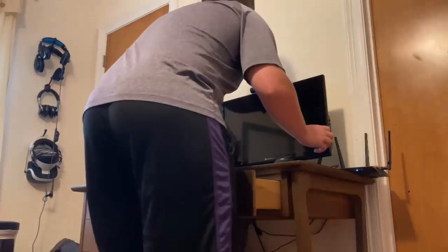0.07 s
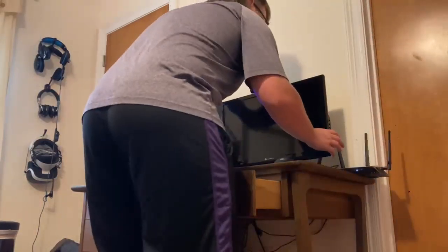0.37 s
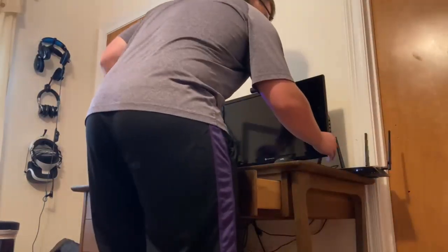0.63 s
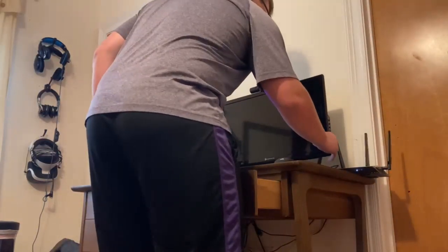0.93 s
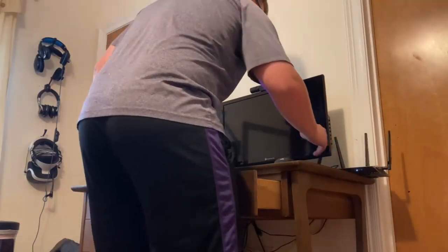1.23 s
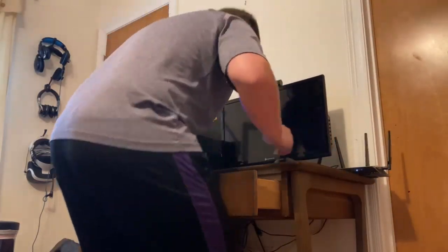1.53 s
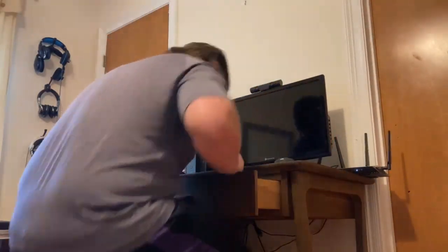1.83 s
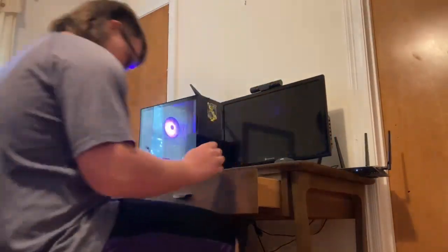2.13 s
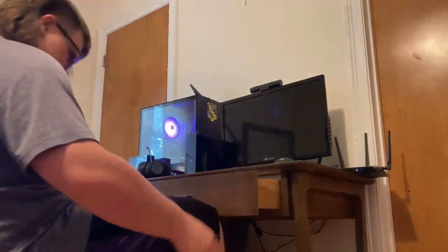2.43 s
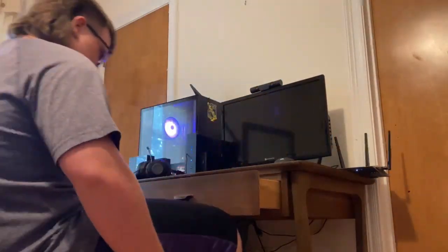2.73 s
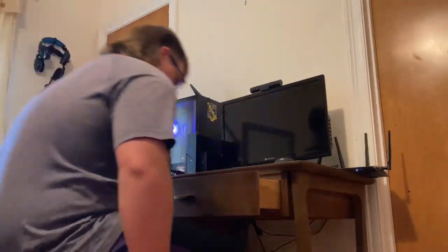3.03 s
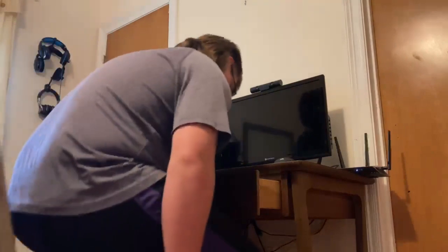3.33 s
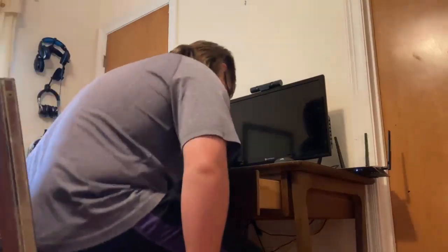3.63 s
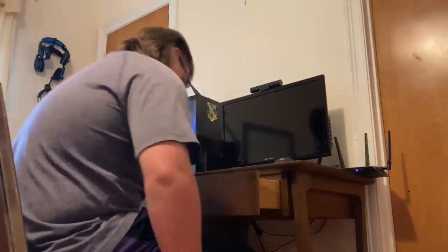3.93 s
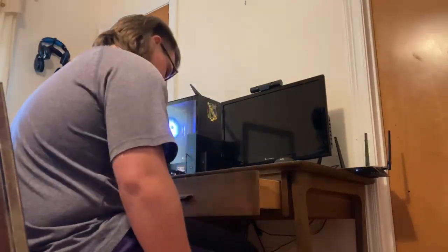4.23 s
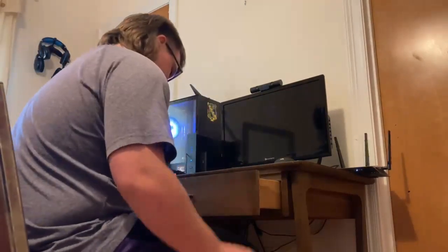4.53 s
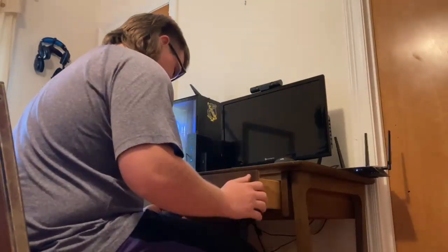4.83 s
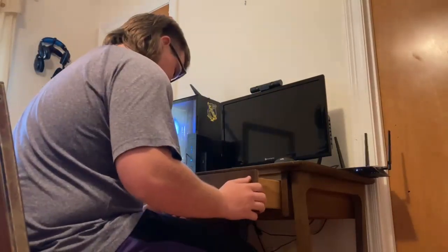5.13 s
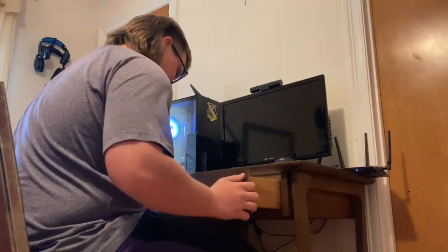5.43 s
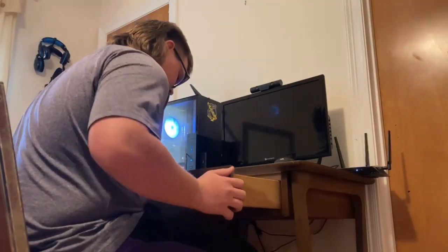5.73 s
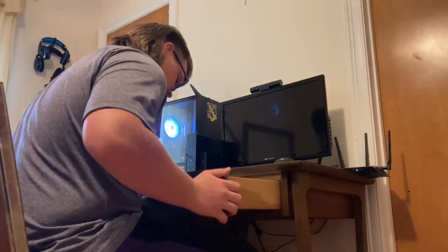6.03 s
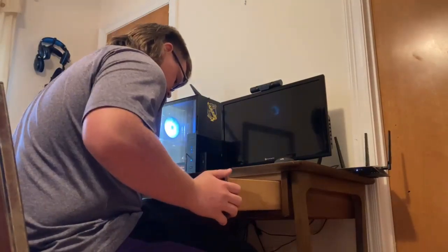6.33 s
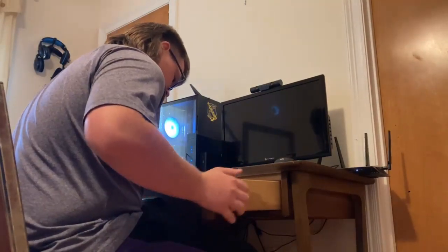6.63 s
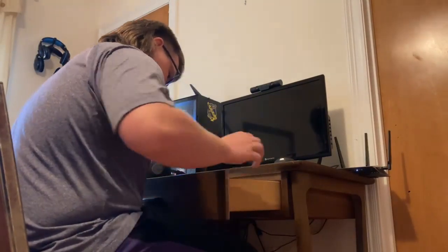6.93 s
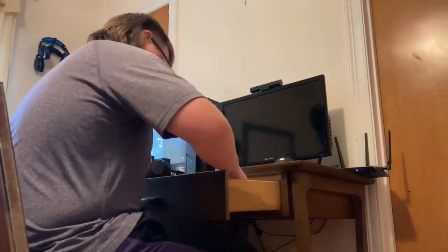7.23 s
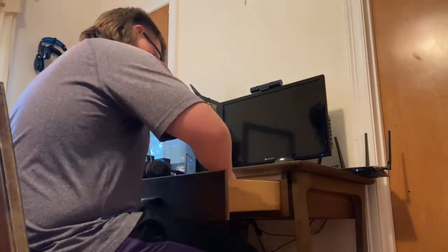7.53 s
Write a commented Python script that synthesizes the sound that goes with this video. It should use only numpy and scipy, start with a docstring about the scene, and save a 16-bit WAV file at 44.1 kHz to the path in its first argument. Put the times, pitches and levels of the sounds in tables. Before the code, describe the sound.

A faint, low computer hum runs throughout in a small bedroom with briefly ringing walls. During the first 1.6 seconds, light rubs, clicks and taps touch a wooden desk. From about 1.9 to 2.4 seconds someone sits on a wooden chair, making loud knocks, leg scuffs and low floor thuds, followed by a rasping creak, small ticks and taps. The chair creaks again at 3.1 seconds, then judders over the floor and drops onto its legs with a loud cluster of thumps around 3.4 seconds. Clothes rustle softly with the movement. From 4.6 to 6 seconds a tight wooden drawer slides out in quieter jerks, with small catches and short, low groans. A faint tap and rub come at 6.6 seconds, a wooden clack at 7.2, and a sleeve brush and light tap near 7.5. The furniture sounds slightly to the left.

```python
"""A small bedroom, where bare walls reverberate after every knock and a computer hums. Someone sits
on a wooden chair, drags it up to a desk and drops it on its legs, then works a wooden drawer open;
small things tap the desk and clothes rustle. Impacts excite the damped normal modes of the wood.
Sliding friction is a run of tiny slips: random ones rub and rasp, and nearly periodic ones
(stick-slip) judder and groan."""
import sys
import numpy as np
from scipy import signal
from scipy.fft import rfft, irfft, next_fast_len
from scipy.io import wavfile
from scipy.ndimage import map_coordinates

SR = 44100
rng = np.random.default_rng(int(sys.argv[2]) if len(sys.argv) > 2 else 0)


def wav_record(signal):
    """Record a signal, one row per channel, as 16-bit PCM in the file named by sys.argv[1]."""
    frames = np.transpose(np.atleast_2d(signal))
    bounded = np.clip(frames, -1, 1)
    # unit amplitude maps onto the largest positive 16-bit level
    quanta = np.round(bounded * 32767).astype(np.int16)
    wavfile.write(sys.argv[1], SR, quanta)


N = 343098
TIME = np.arange(N) / SR
AGE = TIME[:SR * 3 // 4]  # time since a blow [s]


def amp(db):
    """Amplitude ratio of a level in decibels."""
    return 10 ** (np.asarray(db) / 20)


def unit(x):
    """Normalisation to rms 1."""
    return x / np.sqrt(np.mean(x ** 2) + 1e-20)


def at_level(sound, db, length):
    """Normalisation to an rms level over the first length seconds."""
    return amp(db) * sound / np.sqrt(np.mean(sound[:, :int(length * SR) + 1] ** 2) + 1e-20)


def along(points, hz):
    """Interpolation of (frequency, value) points on a logarithmic frequency axis."""
    freqs, values = np.transpose(points)
    return np.interp(np.log(hz + 1), np.log(freqs + 1), values)


def mix(events):
    """Linear superposition of (time [s], sound) events on a stereo track."""
    track = np.zeros((2, N))
    for s, sound in events:
        start = round(s * SR)
        track[:, start:start + sound.shape[-1]] += sound[..., :N - start]
    return track


def wobble(rate):
    """Smooth random modulation through rate knots a second."""
    return map_coordinates(rng.standard_normal(int(N * rate / SR) + 4), [TIME * rate])


def fade(t60):
    """Exponential damping: 60 dB in t60 seconds."""
    return amp(-60 * AGE / t60)


def stroke(length, rise):
    """Pressure envelope of a short rub: it builds, holds and lets go."""
    return (1 - np.exp(-AGE / rise)) * np.exp(-(AGE / length) ** 4)


def gate(s, length, rise, release):
    """Envelope of an effort: exponential rise from time s, exponential release after its length."""
    attack = 1 - np.exp(-np.maximum(TIME - s, 0) / rise)
    return attack * np.exp(-np.maximum(TIME - s - length, 0) / release)


def band(x, edge_hz, kind):
    """Third-order low-, high- or band-pass filtering."""
    return signal.sosfilt(signal.butter(3, edge_hz, kind, fs=SR, output="sos"), x)


def coloured(x, spectrum):
    """Minimum-phase filtering by a (frequency [Hz], gain [dB]) curve."""
    n = x.shape[-1]
    m = 2 * next_fast_len(n // 2 + SR // 10)
    gain = amp(along(spectrum, np.fft.rfftfreq(m, 1 / SR)))
    cepstrum = irfft(np.log(gain + 1e-6))
    cepstrum[1:m // 2] *= 2  # folding the cepstrum makes the filter causal
    cepstrum[m // 2 + 1:] = 0
    return irfft(rfft(x, m) * np.exp(rfft(cepstrum)), m)[..., :n]


# left-right coherence of the diffuse field: (frequency [Hz], coherence [ratio])
COHERENCE = [(50, 0.93), (170, 0.79), (400, 0.87), (700, 0.31), (1400, 0.035), (3000, 0.21)]
def diffuse(n):
    """Diffuse-field white noise: the channels are alike in the bass and little related in the treble."""
    angle = np.arccos(np.clip(along(COHERENCE, np.fft.rfftfreq(n, 1 / SR)), -1, 1)) / 2
    mid, side = irfft(rfft(rng.standard_normal((2, n))) * [np.cos(angle), np.sin(angle)], n)
    return np.array([mid + side, mid - side])


# reverberation time of the room: (frequency [Hz], t60 [s])
ROOM_T60 = [(80, .38), (300, .38), (1000, .44), (4000, .47), (8000, .39), (15000, .27)]
def in_room(x, wet_db, early_db=-1, left_lead=-3):
    """Convolution with a unit-energy room response: direct sound, furniture echoes and the walls' tail."""
    n = len(AGE)
    hz, t, spectra = signal.stft(diffuse(n), SR, nperseg=256)
    decay = amp(-60 * t / along(ROOM_T60, hz)[:, None])
    tail = signal.istft(spectra * decay, SR, nperseg=256)[1][:, :n]
    early = diffuse(n) * fade(0.17)
    response = (amp(wet_db) * unit(tail) + amp(early_db) * unit(early)) / np.sqrt(n)
    response[0, max(-left_lead, 0)] += amp(-5)  # direct sound; the lead is in samples
    response[1, max(left_lead, 0)] += amp(-5)
    return signal.fftconvolve(x[None], unit(response) / np.sqrt(n), axes=1)[:, :len(x)]


def ringing(modes):
    """Impulse response as a sum of damped normal modes, a little different at each contact."""
    return unit(sum(
        amp(db + rng.normal(0, 2)) * fade(t60) * np.sin(2 * np.pi * hz * rng.normal(1, .004) * AGE)
        for hz, db, t60 in modes))


def through(force, colour, modes, ring_db):
    """Forced response of a body: its broad colour plus its ringing modes."""
    ring = signal.fftconvolve(force, ringing(modes))[:len(force)]
    return unit(coloured(force, colour)) + amp(ring_db) * unit(ring)


def blow(colour, modes, db, thump_db, crack_db, force_t60, ring_db, snap_db, rise_s=0.003, **room):
    """Impact response: a mid-band knock at db, with a low thump and a high crack relative to it."""
    force = rng.standard_normal(len(AGE)) * fade(force_t60)
    force[SR // 1000] += amp(snap_db) * np.linalg.norm(force)  # the snap is a single impulse
    onset = 1 - np.exp(-AGE / rise_s)
    wood = unit(coloured(force, colour)) + amp(ring_db) * ringing(modes)
    sound = in_room(onset * wood, **room)
    thump = at_level(band(sound, [70, 400], "band"), db + thump_db, 0.016)
    knock = at_level(band(sound, [400, 2500], "band"), db, 0.016)
    crack = at_level(band(sound, 2500, "high"), db + crack_db, 0.016)
    return thump + knock + crack


def grains(n, rate, spread_db):
    """Friction as shot noise: on average rate slips a second, of random sign and size."""
    slips = (rng.random(n) < rate / SR) * rng.choice([-1, 1], n)
    return unit(slips * amp(spread_db * rng.standard_normal(n)))


def stick_slip(length, rate, jitter, sag=0):
    """Relaxation oscillation: nearly periodic slips whose gaps grow by the fraction sag."""
    gaps = np.abs(rng.normal(1, jitter, size=40)) / rate
    gaps *= 1 + sag * np.minimum(np.cumsum(gaps) / length, 1) ** 2
    slips = np.cumsum(gaps) - gaps[0]
    sizes = amp(rng.normal(0, 1.0, size=40)) * (slips < length)
    return np.bincount((slips * SR).astype(int), sizes, len(AGE))[:len(AGE)]


# spectrum of the fans: (frequency [Hz], gain [dB])
FAN_COLOUR = [(20, -35), (50, 3), (125, 2.5), (200, -14), (255, -8.5), (300, -15), (550, -24), (1000, -34),
              (1400, -34.5), (1800, -45), (7000, -53), (15000, -51.5)]
# tones of the hum: (frequency [Hz], rms level [dB])
HUM_TONES = [(118.4, -58.5), (258.4, -74)]
def computer():
    """Broadband fan noise rumbles under tones that waver by slight phase modulation."""
    air = unit(coloured(diffuse(N), FAN_COLOUR)) * amp(-51.5)
    hum = sum(amp(db) * np.sqrt(2) * np.sin(2 * np.pi * hz * TIME + 0.12 * wobble(2.7))
              for hz, db in HUM_TONES)
    return air + hum


# spectrum of dull rubbing: (frequency [Hz], gain [dB])
RUB_COLOUR = [(300, 0.5), (800, 3.5), (1500, 1.5), (3500, -2), (5500, -12.5), (9000, -22.5)]
# rubs over wood: (time [s], duration [s], level [dB])
WOOD_RUBS = [(0.0, 0.034, -46), (0.111, 0.07, -51.5), (0.501, 0.14, -66), (3.315, .09, -42),
             (6.585, .08, -59)]
def wood_rubs():
    """Dry sliding friction: a hand or a chair leg crosses wood in dense, tiny slips."""
    for s, length, db in WOOD_RUBS:
        force = grains(len(AGE), rate=3900, spread_db=1.5) * stroke(length, rise=0.00043)
        yield s, at_level(in_room(coloured(force, RUB_COLOUR), wet_db=-6), db, length)


# spectrum of sliding cloth: (frequency [Hz], gain [dB])
SWISH_COLOUR = [(2500, -6.5), (5500, -1), (7600, 1.5), (11500, -3.5), (16000, -14)]
# strength of the sitter's movement: (time [s], level [dB])
BODY_MOTION = [(1.6, -78.5), (1.91, -62.5), (2.04, -61), (2.29, -58), (2.83, -69.5), (3.1, -63),
               (3.34, -52), (3.408, -55), (3.58, -73.5), (3.7, -72)]
# a sleeve brushes by as the arm reaches: (time [s], duration [s], level [dB])
SLEEVE_BRUSHES = [(0.058, 0.12, -60), (0.464, 0.098, -69.5), (1.145, 0.12, -61), (1.403, 0.19, -63.5),
                  (3.762, 0.13, -52), (4.288, 0.3, -70.5), (5.139, 0.063, -57), (5.467, 0.31, -72),
                  (7.304, .2, -60)]
def clothes():
    """Cloth friction: a dull rub under pressure and a bright swish in sliding, both following motion."""
    times, motion_db = np.transpose(BODY_MOTION)
    moving = gate(times[0], times[-1] - times[0], rise=0.049, release=0.049)
    body = amp(np.interp(TIME, times, motion_db)) * moving
    sleeve = sum(amp(db) * np.exp(-(2 * (TIME - s) / length - 1) ** 2)
                 for s, length, db in SLEEVE_BRUSHES)
    rub = unit(coloured(grains(N, rate=2800, spread_db=2), RUB_COLOUR))
    rub *= amp(5.5) * body + amp(-5) * sleeve  # a light brush rubs less than it swishes
    swish = unit(coloured(grains(N, rate=4700, spread_db=5.5), SWISH_COLOUR))
    swish *= amp(4.5) * body + sleeve
    folds = amp(2.6 * wobble(28))  # folds catch and let go
    return in_room((rub + swish) * folds, wet_db=2.5)


# spectrum of the struck desk: (frequency [Hz], gain [dB])
DESK_COLOUR = [(120, -11), (400, -9.5), (600, -7), (1150, -10), (1700, -14), (3500, -17.5), (7400, -22),
               (15500, -38.5)]
# taps on desk and drawer: (time [s], level [dB], crack [dB re knock], resonance [Hz])
LIGHT_TAPS = [(0.137, -49.5, -31, 1356), (1.022, -50.5, -20, 678), (1.317, -49.5, -15.5, 1323),
              (1.426, -56, -3.5, 2216), (1.456, -47.5, -19, 800), (1.604, -54, -17.5, 780),
              (2.098, -40, -25, 1100), (2.573, -43, -16, 1503), (2.79, -50, -12, 900),
              (6.634, -56, -22, 1100), (7.541, -52, -15, 1437)]
def desk_taps():
    """Light tap: a fingertip or small thing knocks the wood and excites one local resonance."""
    for s, db, crack_db, hz in LIGHT_TAPS:
        spot = [(hz, 0, 0.015)]  # one mode with a t60 of 15 ms
        yield s, blow(DESK_COLOUR, spot, db, thump_db=-3, crack_db=crack_db, force_t60=0.033,
                      ring_db=-7, snap_db=4, rise_s=0.004, wet_db=-0.5)


# normal modes of the desk: (frequency [Hz], relative level [dB], t60 [s])
DESK_RESONANCES = [(365, -1, .11), (432, 0, .15), (598, 1, .13), (1140, 5, .06), (1695, 5, .045),
                   (2295, -1, .06), (2945, -7, .03), (4737, -14, .1)]
# spectrum of a hard contact: (frequency [Hz], gain [dB])
CLICK_COLOUR = [(150, 10.5), (400, 3), (700, 2), (1600, -3), (3200, -2), (4500, 1.5), (7000, -2),
                (11000, -5.5), (15500, -13)]
# clicks under the hand: (time [s], level [dB])
HARD_CLICKS = [(0.226, -40), (0.488, -63), (0.879, -55), (0.915, -48)]
def monitor_clicks():
    """Hard impact: the force is nearly an impulse, and a firmer click is brighter."""
    firmest_db = max(db for s, db in HARD_CLICKS)
    for s, db in HARD_CLICKS:
        crack_db = 1.5 + 0.65 * (db - firmest_db)
        yield s, blow(CLICK_COLOUR, DESK_RESONANCES, db, thump_db=-6.5, crack_db=crack_db,
                      force_t60=0.012, ring_db=-25, snap_db=16, wet_db=-3.5, early_db=-4)


CHAIR_LEAD = 9  # earlier arrival in the left channel [samples]
# spectrum of a rasping joint: (frequency [Hz], gain [dB])
RASP_COLOUR = [(250, -0.5), (600, 0), (1400, -6.5), (2020, -4.5), (2700, -4.5), (3500, -3.5), (5500, -10),
               (7300, -16), (11000, -6), (16000, -20)]
# normal modes of the joints: (frequency [Hz], relative level [dB], t60 [s])
JOINT_RESONANCES = [(2019, 3, .12), (3408, -2, .08), (4484, -2, .06), (5076, -8, .3), (7257, -4, .07)]
# rasps of the chair's frame: (time [s], duration [s], level [dB])
JOINT_RASPS = [(1.868, 0.011, -47), (2.39, 0.081, -40.5), (3.115, 0.07, -35)]
def joint_rasps():
    """Frictional excitation: a run of tiny slips makes the chair's dry joints ring."""
    for s, length, db in JOINT_RASPS:
        force = grains(len(AGE), rate=900, spread_db=5) * stroke(length, rise=0.0058)
        rasp = through(force, RASP_COLOUR, JOINT_RESONANCES, ring_db=-4)
        yield s, at_level(in_room(rasp, wet_db=-2, left_lead=CHAIR_LEAD), db, length)


# spectrum of the chair: (frequency [Hz], gain [dB])
CHAIR_COLOUR = [(30, -33.5), (60, -18), (230, -15), (390, -3.5), (680, -4.5), (800, -8), (1150, -12.5),
                (2060, -22), (5000, -32.5), (11000, -37), (15500, -47)]
# normal modes of the chair: (frequency [Hz], relative level [dB], t60 [s])
CHAIR_RESONANCES = [(290, -3, .12), (388, -2, .1), (426, -1, .1), (525, 0, .1), (600, -3, .08),
                    (674, -1, .11), (1020, -7, .08), (1160, -5, .09), (1336, -7, .09)]
# the joints take the sitter's weight: (time [s], level [dB], thump [dB re knock])
SEAT_IMPACTS = [(1.895, -22, -1), (1.906, -27, 4), (1.927, -23, -12), (2.120, -30, -5), (2.139, -28.5, 0),
                (2.166, -27, -1), (2.295, -19, -5), (2.324, -29, -6)]
def seat_knocks():
    """Contact stiffening: the joints knock more brightly as the weight settles."""
    hardening_db_per_s = 19.5
    for s, db, thump_db in SEAT_IMPACTS:
        crack_db = -23 + hardening_db_per_s * (s - SEAT_IMPACTS[0][0])
        yield s, blow(CHAIR_COLOUR, CHAIR_RESONANCES, db, thump_db, crack_db, force_t60=0.013,
                      ring_db=-3, snap_db=-10, wet_db=-8.5)


# throbs of the floorboards: (time [s], duration [s], gain [dB], frequency [Hz])
FLOOR_THROBS = [(1.903, .028, -13, 138), (2.125, .05, -28, 96), (2.3, .12, -28, 80), (3.418, .1, -22.5, 66),
                (3.49, .12, -24, 60)]
def floor_booms():
    """Low resonance: a shifting load sets the floorboards briefly vibrating at one frequency."""
    for s, length, db, hz in FLOOR_THROBS:
        envelope = stroke(length, rise=0.031) * fade(1.0)
        yield s, amp(db) * envelope * np.sin(2 * np.pi * hz * AGE)


# the loaded chair scuffs the floor: (time [s], duration [s], level [dB])
LEG_SCUFFS = [(1.92, .03, -28), (2.118, .056, -27.5), (2.268, .022, -34), (2.303, .051, -26.5)]
def leg_scuffs():
    """Rough sliding friction: random slips of the legs drive the chair's modes."""
    for s, length, db in LEG_SCUFFS:
        force = grains(len(AGE), rate=1800, spread_db=4) * stroke(length, rise=0.036)
        scuff = through(force, CHAIR_COLOUR, CHAIR_RESONANCES, ring_db=-11)
        yield s, at_level(in_room(scuff, wet_db=-2), db, length)


# spectrum of a ticking joint: (frequency [Hz], gain [dB])
TICK_COLOUR = [(800, -11.5), (3000, -3.5), (5500, 1), (7800, 7), (11500, 0.5), (16000, -11.5)]
# ticks of the chair's joints: (time [s], level [dB])
JOINT_TICKS = [(2.405, -36), (2.413, -44), (2.429, -40), (2.462, -45), (2.709, -47.5), (3.122, -34),
               (3.474, -33.5), (4.055, -53)]
def joint_ticks():
    """A short transient has a broad spectrum: a dry joint gives one bright tick."""
    for s, db in JOINT_TICKS:
        snap = coloured(rng.standard_normal(len(AGE)) * fade(0.0043), TICK_COLOUR)
        yield s, at_level(in_room(snap, wet_db=0, early_db=-19, left_lead=CHAIR_LEAD), db, 0.005)


# low resonance of the chair's frame: (frequency [Hz], gain [dB])
FRAME_COLOUR = [(60, -14), (150, -6), (200, 1), (250, 0), (340, -11), (520, -18), (1200, -34), (5000, -55)]
# a leg judders over the floor: (time [s], duration [s], initial slip rate [1/s], level [dB])
LEG_JUDDERS = [(2.6, 0.035, 215, -45.5), (3.316, 0.05, 270, -28), (3.416, 0.03, 252, -18),
               (3.478, 0.024, 252, -21.5), (3.796, 0.016, 215, -35)]
def leg_judders():
    """Stick-slip drives the frame's low resonance and slows as the leg stalls."""
    for s, length, rate, db in LEG_JUDDERS:
        force = stick_slip(length, rate, jitter=0.1, sag=0.35)
        yield s, at_level(in_room(coloured(force, FRAME_COLOUR), wet_db=-2.5), db, length)


# spectrum of the struck floor: (frequency [Hz], gain [dB])
FLOOR_COLOUR = [(28, -30), (55, -6), (150, -12), (230, -2), (430, -15), (600, -12), (1260, -21),
                (2000, -28), (3300, -21), (4400, -28), (5600, -37), (9000, -41), (15500, -56)]
# normal modes of the floor: (frequency [Hz], relative level [dB], t60 [s])
FLOOR_RESONANCES = [(121, -9, .2), (197, 2, .2), (253, 2, .2), (580, -7, .14), (841, -11, .1),
                    (1180, -5, .08), (1310, -6, .07)]
# the legs land: (time [s], level [dB], thump [dB re knock], crack [dB re knock])
LEG_LANDINGS = [(3.412, -23, 4, -5), (3.429, -23, 6, -16), (3.474, -28, 2, -7), (3.501, -28.5, -2, -15)]
def leg_drops():
    """Impact excitation: the legs land one after another and ring the floor's modes."""
    for s, db, thump_db, crack_db in LEG_LANDINGS:
        yield s, blow(FLOOR_COLOUR, FLOOR_RESONANCES, db, thump_db, crack_db, force_t60=0.014,
                      ring_db=-10, snap_db=-5, wet_db=-5, left_lead=CHAIR_LEAD)


# normal modes of the drawer's box: (frequency [Hz], relative level [dB], t60 [s])
BOX_RESONANCES = [(385, -5, .08), (575, 0, .1), (1460, -21, .05)]
# the drawer catches: (time [s], level [dB])
RUNNER_CATCHES = [(4.603, -52), (4.626, -49), (4.661, -48), (4.815, -45.5), (5.190, -45.5), (5.543, -48.5),
                  (5.584, -44), (5.656, -47.5)]
def drawer_catches():
    """Impulsive excitation: the drawer catches on its runners with a sharp tick."""
    for s, db in RUNNER_CATCHES:
        yield s, blow(DESK_COLOUR, BOX_RESONANCES, db, thump_db=-2, crack_db=-14, force_t60=0.025,
                      ring_db=-15, snap_db=6, wet_db=-4.5)


# spectrum of the drawer's box: (frequency [Hz], gain [dB])
BOX_COLOUR = [(35, -20), (80, -1.5), (140, 1.5), (220, -6), (580, -10.5), (760, -16), (1450, -20.5),
              (2500, -29), (5300, -40), (11000, -45.5), (15000, -70.5)]
# the tight drawer comes out in jerks: (time [s], duration [s], level [dB])
DRAWER_PULLS = [(4.632, .14, -48), (4.763, .078, -49), (5.2, .07, -45.5), (5.28, .07, -49.5),
                (5.365, .16, -44.5), (5.57, .06, -41.5), (5.74, .1, -46), (5.86, .08, -50)]
def drawer_slide():
    """Sliding friction of wood on wood: uneven slips force the drawer's box to vibrate."""
    friction = sum(amp(db) * gate(s, length, rise=0.0018, release=0.021)
                   for s, length, db in DRAWER_PULLS)
    roughness = grains(N, rate=170, spread_db=4) + amp(-9) * rng.standard_normal(N)
    force = roughness * friction * amp(2.8 * wobble(17))
    box = unit(through(force, BOX_COLOUR, BOX_RESONANCES, ring_db=-17))
    return in_room(box * np.sqrt(np.mean(friction ** 2)), wet_db=-7.5, early_db=-3)


# the drawer binds: (time [s], duration [s], slip rate [1/s], level [dB], ring [dB re broad colour])
DRAWER_GROANS = [(4.66, 0.052, 127, -40.5, -3), (5.215, 0.028, 107, -45, -29),
                 (5.592, 0.043, 144, -41.5, 10), (5.756, 0.069, 132, -42.5, -29)]
def drawer_groans():
    """Stick-slip: the binding drawer groans at a pitch set by the slip rate."""
    for s, length, rate, db, ring_db in DRAWER_GROANS:
        groan = through(stick_slip(length, rate, jitter=0.12), BOX_COLOUR, BOX_RESONANCES, ring_db)
        yield s, at_level(in_room(groan, wet_db=-4.5), db, length)


# the hand lets go, then knocks: (time [s], level [dB], thump [dB re knock], crack [dB re knock])
DRAWER_CLACKS = [(6.566, -53, -11, -5), (7.164, -38.5, -5, -14.5)]
def drawer_clacks():
    """Free vibration after impact: the loose drawer seats over some milliseconds and its front rings."""
    for s, db, thump_db, crack_db in DRAWER_CLACKS:
        yield s, blow(DESK_COLOUR, DESK_RESONANCES, db, thump_db, crack_db, force_t60=0.067,
                      ring_db=0, snap_db=-17, rise_s=0.012, wet_db=-8)


def scene():
    """Superposition of all sources; a level difference sets the furniture a little to the left."""
    chair = mix([*seat_knocks(), *leg_drops(), *leg_scuffs(), *leg_judders(), *floor_booms()])
    touches = mix([*desk_taps(), *drawer_clacks(), *monitor_clicks(), *wood_rubs()])
    drawer = drawer_slide() + mix([*drawer_groans(), *drawer_catches()])
    creaks = mix([*joint_ticks(), *joint_rasps()])
    furniture = (chair + touches + drawer) * amp([[.5], [-.5]])
    return furniture + creaks + clothes() + computer()


def record(dry):
    """Band limiting: the microphone loses the deepest bass and passes nothing above its upper limit."""
    bottom_hz, top_hz = 42, 16000
    thinned = band(dry, bottom_hz, "high")
    m = next_fast_len(N + SR // 2)
    passband = np.fft.rfftfreq(m, 1 / SR) < top_hz
    return irfft(rfft(thinned, m) * passband, m)[:, :N]


dry = scene()
out = record(dry)
wav_record(out)
```